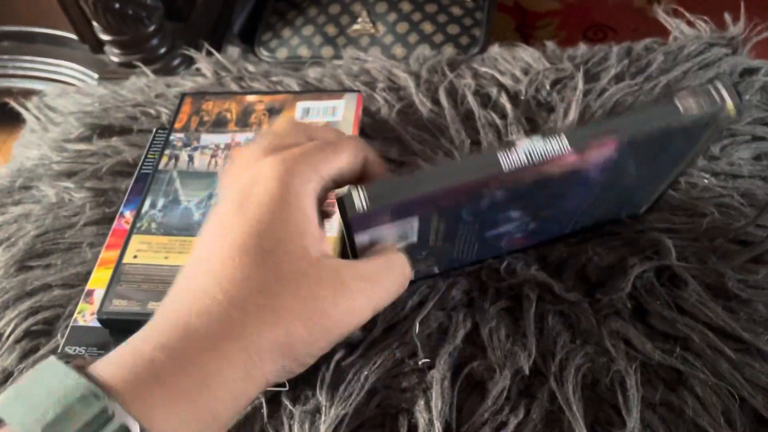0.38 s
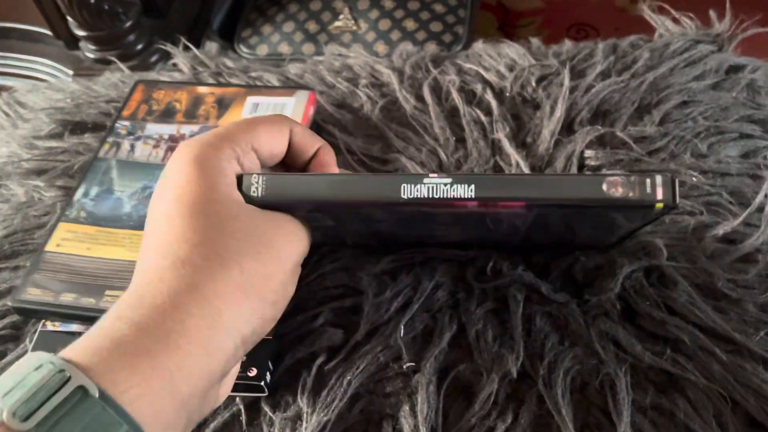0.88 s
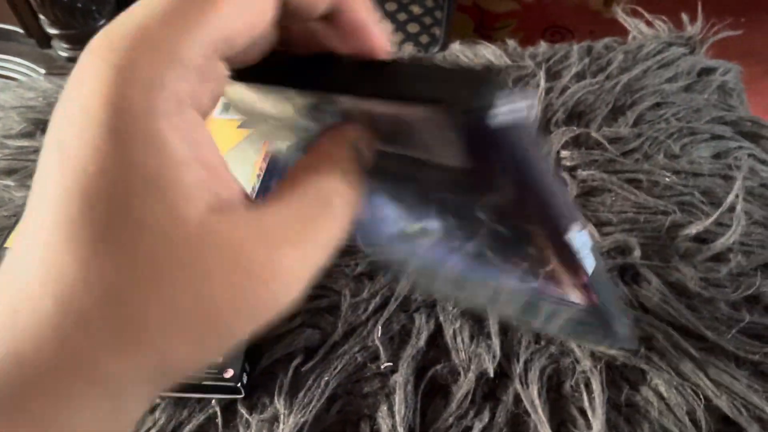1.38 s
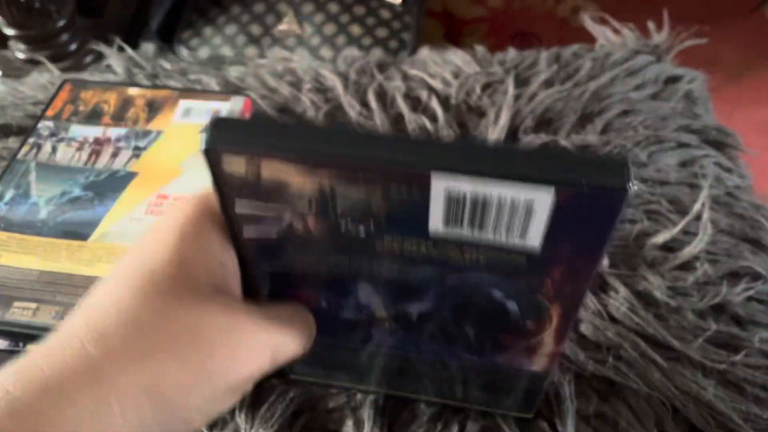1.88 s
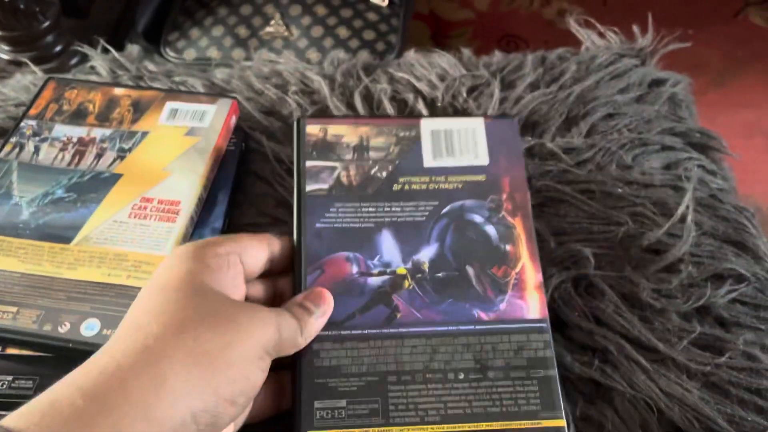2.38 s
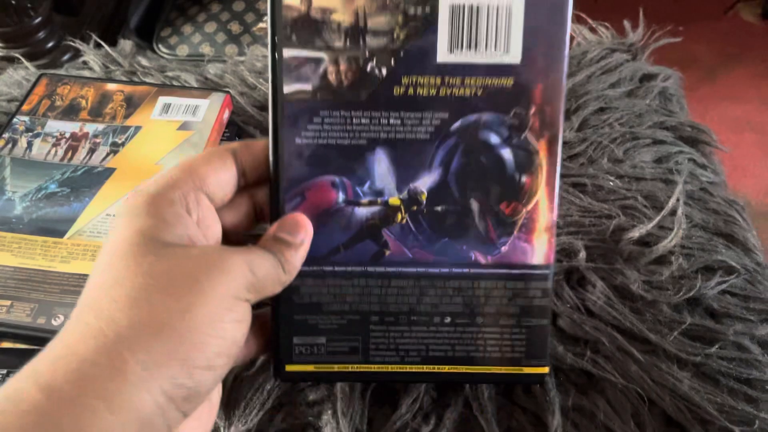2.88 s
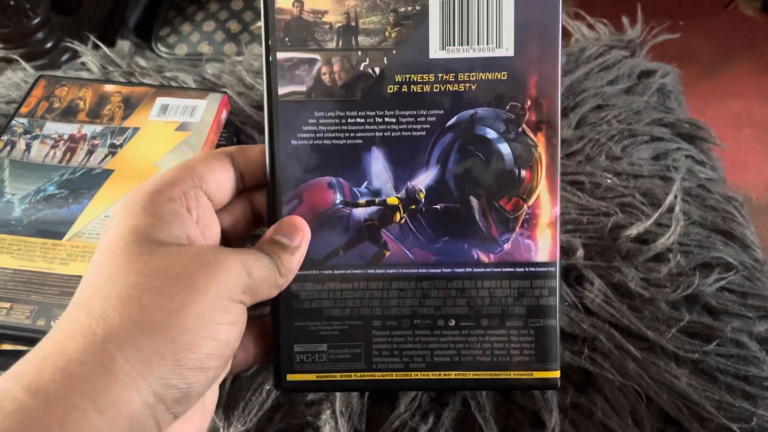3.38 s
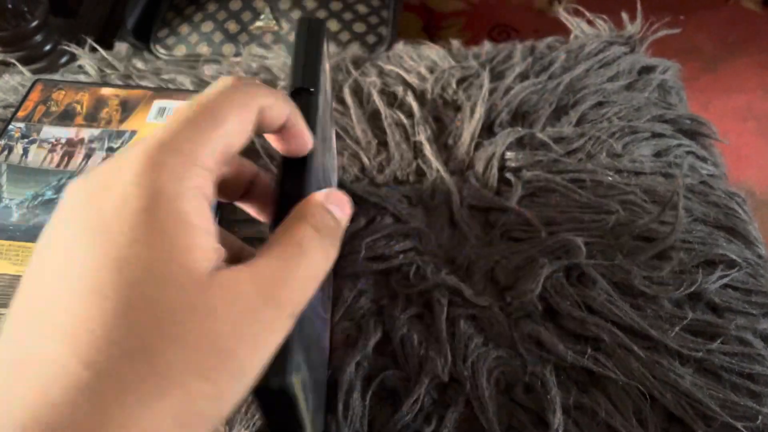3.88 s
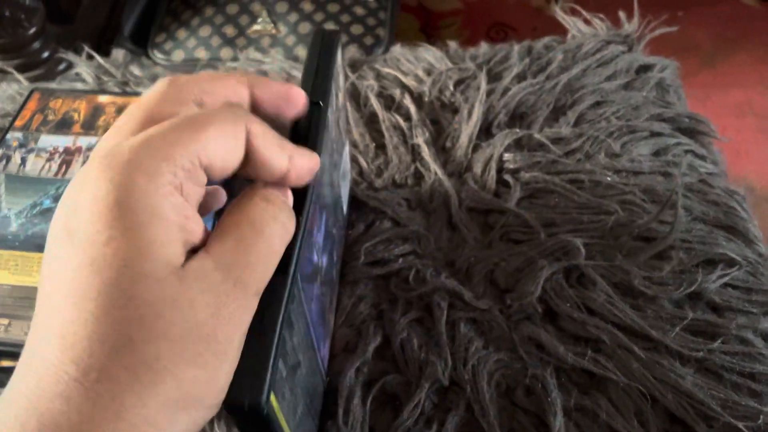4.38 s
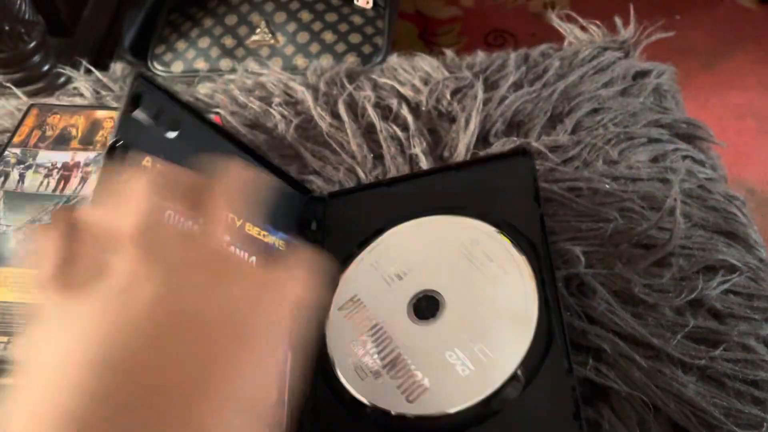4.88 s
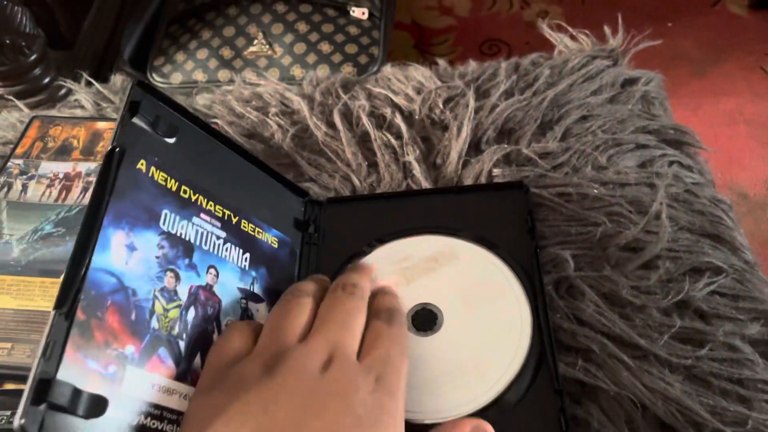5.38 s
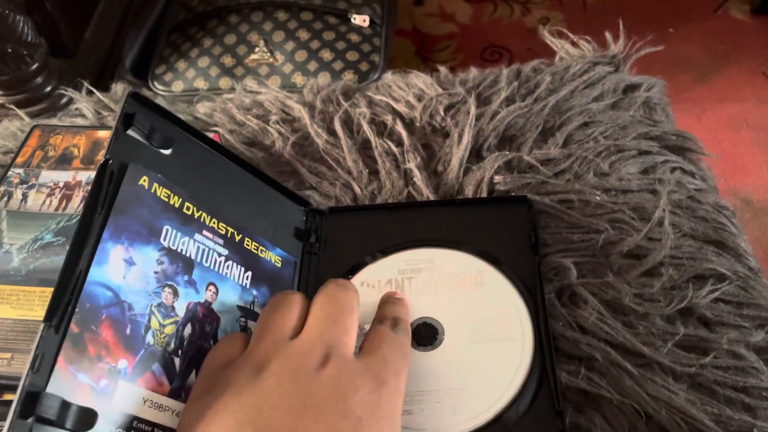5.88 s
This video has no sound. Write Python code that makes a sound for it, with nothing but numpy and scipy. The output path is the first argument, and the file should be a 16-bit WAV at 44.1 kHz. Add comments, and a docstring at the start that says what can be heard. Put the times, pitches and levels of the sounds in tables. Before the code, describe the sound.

Stereo microphones near the hand catch dry skin strokes, dull fingertip knocks and scattered light plastic ticks over faint room air. A sharper clack breaks the first half, followed by over a second of calm. The case is gripped again, bursts open with the loudest crack and a short rattle, and the disc inside clicks when pushed. Only a small, short room reflection follows.

```python
"""Over quiet room air and a low hum, a hand turns a thin plastic disc case: skin hisses on the sleeve
in strokes, the shell ticks and creaks, fingertips knock the hollow box. Harder snaps come near 2.3 s;
at 4.4 s the latch lets go, the lid flexes and the loose disc rattles; at 5 s the disc is pressed.
Filtered noise makes air and skin, jolts through damped modes the shell, decaying sines knocks and lid."""
import sys
import numpy as np
from scipy import signal
from scipy.fft import rfft, irfft, next_fast_len
from scipy.io import wavfile
from scipy.ndimage import uniform_filter1d

SR = 44100
rng = np.random.default_rng(int(sys.argv[2]) if len(sys.argv) > 2 else 0)


def inscribe(sig):
    """Save sig as 16-bit PCM at rate SR to the path in sys.argv[1].

    A 1-D sig is mono; a 2-D sig holds one channel per row.
    Samples are clipped to [-1, 1] before scaling.
    """
    pcm = np.round(np.clip(np.atleast_2d(sig).T, -1, 1) * 32767)
    wavfile.write(sys.argv[1], SR, pcm.astype(np.int16))


def attenuation_scalar(level_db):
    """Turn a level in dB into a linear amplitude multiplier (20 dB per decade)."""
    decades = np.asarray(level_db, float) / 20
    return 10 ** decades


N = 264159
OPEN_S = 4.45  # the lid is up from here on
LEAD = 44  # samples of soft start before a click

# modes of the shell: f/Hz, width/Hz, level/dB
SHELL = [(325, 210, -7.5), (664, 53, 1), (846, 190, -4), (1040, 136, 2), (1214, 86, -7.5), (1550, 91, 2),
         (1950, 400, -21), (2238, 120, 1.5), (2875, 170, -7), (2933, 48, -10.5), (3670, 83, -12.5),
         (4284, 110, -3.5), (5200, 130, -10.5), (6050, 380, -6.5), (8170, 3100, -22), (10330, 550, -14.5),
         (12500, 3300, -30)]
# hand sounds, likeness of the two microphones: f/Hz, correlation
NEAR_SAME = [(200, 0.92), (1400, 1), (3500, 0.49), (7000, 0.89), (15000, 0.96)]
# hand sounds, lean to the left: f/Hz, left minus right/dB
NEAR_LEFT = [(60, 1.5), (180, -3), (550, 5), (1650, 3), (4970, 2.5), (15000, -1)]


def unit_rms(x):
    """Scales to rms 1."""
    return x / np.sqrt(np.mean(np.abs(x) ** 2) + 1e-20)


def read(points, hz):
    """Interpolates a table on a log-frequency axis."""
    f, value = np.transpose(points)
    return np.interp(np.log(hz + 1), np.log(f + 1), value)


def add(mix, start_s, sound):
    """Lays a sound into the mix at start_s."""
    part = mix[:, round(start_s * SR):][:, :sound.shape[1]]
    part += sound[:, :part.shape[1]]


def pair(first, other, same, left_db):
    """Two microphone spectra that share the part `same` and lean left by left_db."""
    same = np.clip(same, -1, 1)
    left = first * attenuation_scalar(left_db / 2)
    right = (same * first + np.sqrt(1 - same ** 2) * other) * attenuation_scalar(-left_db / 2)
    return np.array([left, right])


def hiss(size, field_db, same, left):
    """Noise from random short-time spectra under field_db(hz, t), for both microphones."""
    hop = size // 4
    hz = np.fft.rfftfreq(size, 1 / SR)[:, None]
    t = np.arange(N // hop + 5) * hop / SR
    a, b, c, d = rng.standard_normal((len(t), len(hz), 4)).T
    z = pair(a + 1j * b, c + 1j * d, read(same, hz), read(left, hz)) * attenuation_scalar(field_db(hz, t))
    return signal.istft(z, nperseg=size, noverlap=size - hop)[1][:, :N]


def ring(hz, mode_hz, width_hz):
    """Response of one damped mode, gain 1 at its top."""
    return 1j * hz * width_hz / (mode_hz ** 2 - hz ** 2 + 1j * hz * width_hz)


def room_tone():
    """Steady air noise, and a low hum that wavers: noise through a narrow resonance twice."""
    # spectrum of the air, relative: f/Hz, density/dB per Hz
    air_spectrum = [(20, -17), (45, -20), (60, -10), (90, -15), (220, -12.5), (300, -19), (380, -26),
                    (1150, -28), (1450, -34.5), (3100, -41), (3800, -54.5), (7000, -64), (11000, -72),
                    (16000, -85)]
    # likeness of the two microphones: f/Hz, correlation
    air_same = [(60, 1), (180, 0.95), (550, 0.41), (1650, -0.26), (4970, 0.62), (15000, 0.7)]
    # lean to the left: f/Hz, left minus right/dB
    air_left = [(60, 8.5), (180, 1.5), (550, 4.5), (1650, -2), (4970, -0.5), (15000, 7)]
    air_rms_db, hum_rms_db = -51.5, -51
    hum_hz, pass_width_hz = 58.4, 12
    air = unit_rms(hiss(2048, lambda hz, t: read(air_spectrum, hz) + 0 * t, air_same, air_left))
    hum_filter = ring(np.fft.rfftfreq(N, 1 / SR), hum_hz, pass_width_hz) ** 2
    hum = unit_rms(irfft(rfft(rng.standard_normal(N)) * hum_filter, N))
    return attenuation_scalar(air_rms_db) * air + attenuation_scalar(hum_rms_db) * hum


def strokes(t):
    """Each stroke rises, holds and falls; gives their joint gain and the brightness of the mix."""
    # strokes of skin on the sleeve: start of hold/s, hold/s, hiss level/dB, brightness/dB per octave,
    # fall/dB per s
    stroke_table = [(.001, .08, -57.5, -1, 161), (0.284, .04, -69.5, -5, 300), (0.375, .04, -64, -3, 400),
                    (0.452, .13, -65, -3, 300), (0.647, .155, -60.5, 0.5, 204),
                    (1.03, .06, -61.5, 3.5, 300), (1.135, .06, -64.5, 1.5, 72),
                    (1.385, .045, -60.5, -2.2, 500), (1.481, .03, -65, -2.5, 400),
                    (1.587, .2, -60, 0.5, 500), (1.879, .09, -58, -1, 298), (2.056, .18, -68, -2, 300),
                    (2.268, .08, -60.5, -2.5, 296), (2.664, .06, -65.5, 2, 158),
                    (3.588, .1, -63.5, -3.5, 295), (3.777, .11, -64, -3.5, 300),
                    (3.982, .11, -71, -0.5, 150), (4.374, .16, -60, -1.8, 202.5),
                    (4.594, .03, -70.5, 5.5, 298), (4.685, .07, -70.5, 2.5, 201.5),
                    (4.901, .02, -64, 2.7, 600), (4.93, .1, -69, 2.5, 296), (5.024, .27, -58.5, 1.4, 396),
                    (5.352, .08, -69.5, -4, 300), (5.437, .04, -66.5, 9.5, 501),
                    (5.559, .03, -66, -2.5, 200.5), (5.816, .03, -67, -3, 401.5),
                    (5.932, .06, -78, -3, 300)]
    rise_faster = 3.05  # rise rate over fall rate
    start_s, hold_s, level_db, bright_db, fall_db = np.transpose(stroke_table)[:, :, None]
    outside_s = np.maximum(np.maximum(rise_faster * (start_s - t), t - start_s - hold_s), 0)
    power = attenuation_scalar(np.maximum(level_db - fall_db * outside_s, -150)) ** 2
    total = power.sum(0)
    return np.sqrt(total), (power * bright_db).sum(0) / total


def shell(hz, spot_db=0):
    """Sum of the shell's modes, neighbours in opposite sign, plus the part that does not ring."""
    # unringing part: f/Hz, level/dB
    crack = [(200, -38.5), (1000, -13), (3000, -9.5), (6000, -16), (9000, -22), (12000, -31),
             (14500, -31.5), (16500, -40.5)]
    mode_hz, width_hz, db = np.transpose(SHELL)[:, :, None]
    sign = (-1) ** np.arange(len(SHELL))[:, None]
    modes = sign * attenuation_scalar(db + spot_db) * ring(hz, mode_hz, width_hz)
    return modes.sum(0) + attenuation_scalar(read(crack, hz))


def slide():
    """Skin catches unevenly: a dry flickering hiss, and clumps of tiny slips set the shell murmuring."""
    # hiss of the skin, relative: f/Hz, level/dB
    skin_spectrum = [(300, -5.5), (1000, 7.5), (2500, -1), (4000, 1), (6000, -8.5), (8000, -8),
                     (11000, -12.5), (14000, -18.5), (16500, -33.5)]
    shut_db, open_db = -7, -10.5  # shell murmur against the hiss, lid shut and lid up
    slips_per_s = 2600
    hop = 64
    frames, t = N // hop + 5, np.arange(N) / SR
    frame_s = np.arange(frames) * hop / SR
    gain, bright_db = strokes(frame_s)
    flicker, clumps = (unit_rms(uniform_filter1d(rng.standard_normal(frames), size)) for size in (4, 14))

    # creases in the sleeve favour now one band, now another
    patches = uniform_filter1d(rng.standard_normal((frames, 129)), size=24, axis=0)
    patches = unit_rms(uniform_filter1d(patches, size=5, axis=1)).T
    rustle_db = 2.5 * patches

    def field_db(hz, t):
        tilt_db = bright_db * np.log2((hz + 300) / 6000)
        return rustle_db + read(skin_spectrum, hz) + tilt_db + 3.4 * flicker

    skin = unit_rms(hiss(4 * hop, field_db, NEAR_SAME, NEAR_LEFT))

    sizes = attenuation_scalar(3.7 * np.minimum(rng.exponential(1, (2, N)), 4)) * rng.choice([-1, 1], (2, N))
    sizes *= attenuation_scalar(3.2 * np.interp(t, frame_s, clumps))
    slips = sizes * (rng.random((2, N)) < slips_per_s / SR)
    hz = np.fft.rfftfreq(N, 1 / SR)
    slips = pair(*rfft(slips), read(NEAR_SAME, hz), read(NEAR_LEFT, hz))
    shell_murmur = irfft(slips * shell(hz), N)
    disc_murmur = (t > OPEN_S) * irfft(slips * disc(hz), N)
    murmur = (shell_murmur + disc_murmur) / shell_murmur.std()
    grip = attenuation_scalar(np.where(t > OPEN_S, open_db, shut_db))
    return np.interp(t, frame_s, gain) * (skin + grip * murmur)


def click(peak_db, ring_hz, hard_db, fade_db, chance, lid_up):
    """A few quick slips shake the shell; the spot that slips favours some modes and one above all."""
    favoured_db, away_db = 6, 1.5  # favoured ring; loss of other modes per octave away from it
    size = 4096
    hz, ms = np.fft.rfftfreq(size, 1 / SR), np.arange(size) / SR * 1000
    jolts = chance[:2 * size].reshape(2, size)
    jolts = jolts * np.abs(jolts) ** 0.8 * attenuation_scalar(-max(fade_db, 1) * ms)  # even the slowest creak dies
    jolts[0, :2] = 4.5  # sharp first break

    octaves_away = np.abs(np.log2(np.transpose(SHELL)[0, :, None] / ring_hz))
    spot_db = 1.5 * chance[2 * size:, None] - away_db * np.minimum(octaves_away, 1.5)
    body = shell(hz, spot_db)
    body = body + attenuation_scalar(favoured_db) * ring(hz, ring_hz, 0.077 * ring_hz)
    body = body + lid_up * attenuation_scalar(-22.5) * disc(hz)
    body *= attenuation_scalar(hard_db * np.log2((hz + 300) / 2300))

    sound = irfft(pair(*rfft(jolts), read(NEAR_SAME, hz), read(NEAR_LEFT, hz)) * body)
    sound = np.roll(sound, LEAD, 1)[:, :size // 2]
    sound = sound * signal.windows.tukey(size // 2, LEAD / size * 4)  # LEAD samples of fade each end
    return attenuation_scalar(peak_db) * sound / np.abs(sound[0]).max()


def clicks():
    """Every tick, creak and snap of the shell, each with its own random slips."""
    # clicks: t/s, left peak/dB, favoured ring f/Hz, hardness/dB per octave,
    # fade of the slips/dB per ms (below 1 acts as 1)
    click_table = [(0.021, -32.5, 3930, -7, 4.5), (0.0565, -37, 3650, -4, 0), (0.0677, -39.5, 1550, -12, 3),
                   (.1518, -43, 1490, 0, 2.9), (0.1672, -38, 4500, -4, 3), (0.3866, -45, 3100, 2, 3),
                   (.401, -49, 1500, 2, 1.5), (0.4755, -46.5, 1550, 5, 4), (0.5258, -41.5, 2240, -5.5, 2.5),
                   (0.54, -47, 2300, -3, 4), (.5608, -44, 3100, -4.5, 2.5), (0.6659, -38, 955, -5, 0.1),
                   (.732, -37.5, 690, -3, 1), (0.79, -40, 940, 0.5, 5.5), (.8017, -41.5, 725, -4.5, 4.5),
                   (0.8975, -45.5, 3670, -4, 6), (1.1492, -41, 2340, 1.5, 2),
                   (1.1573, -39.5, 4150, -3.5, 2.5), (1.1855, -37.5, 1620, -5.5, -1),
                   (1.3913, -44, 3610, 1, 0.5), (1.406, -39, 1270, -0.5, 2.5), (1.443, -48.5, 4440, 0, 3),
                   (1.4825, -38, 1560, -1.5, 3), (1.5, -44, 2470, -1.5, 12), (1.5699, -34.5, 980, -4.5, 7),
                   (1.7263, -46, 1550, -3, 2), (1.831, -45.5, 905, 0, 1.5),
                   (1.8888, -39.5, 3570, -3.5, 1.5), (1.9061, -32.5, 1550, -1, 0.9),
                   (1.9203, -29, 1520, -0.5, 1), (1.925, -30.5, 1550, 0, 4), (1.9607, -27.5, 3880, -3, 2.5),
                   (1.968, -37.5, 830, -5, 10), (1.995, -52.5, 6100, 6, 7), (2.05, -53.5, 3500, -5, 9),
                   (2.095, -46.5, 2480, -2, 5), (2.188, -39.5, 2570, -2.8, -3),
                   (2.2186, -34, 5300, -5.5, 3), (2.275, -14.5, 2450, 3, 13), (2.277, -26, 2450, 2.5, 2),
                   (2.2796, -16, 2960, 0, 3.5), (2.2919, -34, 1220, 1, 3), (2.3093, -25.5, 1560, -2, 1.4),
                   (2.3239, -27, 5880, -2.5, 3), (2.3339, -31.5, 1066, 2.5, 2),
                   (2.3389, -24, 3080, -2.5, 3.5), (2.3774, -41.5, 1130, -8, 1.5),
                   (2.3917, -40.5, 1170, 0, 13), (2.79, -58.5, 5000, 0, 12), (3.5872, -37, 3670, -3, 2.6),
                   (3.6, -44, 1170, -.5, 3), (3.6414, -41, 744, -3, 9.5), (3.6619, -32, 950, 0.1, 3.5),
                   (3.747, -44.5, 1990, -5.5, -1), (3.7826, -40, 940, -3.5, 1),
                   (3.8092, -39.5, 1310, 4.5, 5.5), (3.822, -36.5, 1580, -5, -0.5),
                   (3.831, -36.5, 3450, -5.7, 1.3), (3.8512, -33.5, 1484, -2, 2.5),
                   (3.8834, -38.5, 780, -3.5, 1.5), (4.0543, -47, 870, -1, 3), (4.379, -8, 960, -3, 1.4),
                   (4.3829, -8.5, 1190, -1, 2.5), (4.3842, -2.5, 1060, 0.5, 11.5),
                   (4.3955, -14, 1110, 4.5, 10), (4.3992, -18.5, 6050, -3.2, 1),
                   (4.4025, -13.5, 2300, -0.5, 2), (4.4116, -18.5, 935, 0, 0.5),
                   (4.4197, -20.5, 2450, 6, 0), (4.4246, -15.5, 4350, 4.5, 1.7), (4.43, -21, 4300, 1, 11),
                   (4.439, -19, 930, 1, 1), (4.443, -24, 2800, -1, 5.5), (4.4532, -24.5, 3070, -2, 2),
                   (4.462, -20, 2450, 5.5, 8.5), (4.4657, -20, 960, -0.9, 7.5),
                   (4.477, -26, 2440, -1.5, 1.8), (4.4974, -35.5, 3000, 2.5, 2.3),
                   (4.508, -35.5, 2265, -0.5, 2.5), (4.5203, -29, 2540, -1.5, 9.5),
                   (4.5259, -38, 2470, -6.5, 2.5), (4.5358, -38, 2950, -8.5, 4),
                   (4.5777, -47, 2840, -4.5, 1.9), (4.7177, -39.5, 746, -13, 21),
                   (4.763, -47, 3000, -9.5, 1), (4.8902, -45, 1020, 3.5, 1.2),
                   (5.0302, -19.5, 3000, 5.5, 6), (5.0341, -26, 1097, -1.5, 2),
                   (5.0472, -25, 2360, -3, 2.5), (5.0593, -13.5, 2650, 0.8, 3.5),
                   (5.0797, -36, 2470, 0.5, 2.5), (5.085, -36, 2400, 4.5, 10.5),
                   (5.1208, -37.5, 4620, -2, 2.3), (5.1675, -36.5, 850, -11, 7),
                   (5.2257, -40.5, 2950, 2.5, -3.3), (5.2509, -34, 1020, -3, 3.2), (5.283, -43, 2800, 3, 0),
                   (5.361, -46, 2800, -5, 5.5), (5.393, -45, 2780, -3, 1), (5.417, -49.5, 2580, -0.5, 2),
                   (5.4765, -47, 717, 5, 5), (5.5557, -25.5, 2450, -4, 3), (5.5615, -29, 2860, -1.5, 2.5),
                   (5.5703, -31.5, 2840, -3, 3), (5.8305, -43, 2830, -7, 5)]
    mix = np.zeros((2, N))
    chance = rng.standard_normal((len(click_table), 8192 + len(SHELL)))
    for (s, *blow), row in zip(click_table, chance):
        add(mix, s - LEAD / SR, click(*blow, row, s > OPEN_S))
    return mix


def room(x):
    """Sparse reflections of random sign, each band dying at its own speed."""
    # decay of the reflections: f/Hz, t60/s
    decay = [(250, 0.28), (1000, 0.21), (4000, 0.12), (12000, 0.048)]
    first, spacing = 200, 20  # samples
    taps = np.zeros((2, SR // 2))
    at = np.arange(first, SR // 2 - spacing, spacing)
    at = at + rng.integers(0, spacing, (2, (SR // 2 - first - 1) // spacing))
    np.put_along_axis(taps, at, rng.choice([-1., 1.], at.shape), 1)
    hz, t, z = signal.stft(taps, SR, nperseg=256)
    tail = signal.istft(z * attenuation_scalar(-60 * t / read(decay, hz)[:, None]), SR, nperseg=256)[1]
    return signal.fftconvolve(x, tail / np.linalg.norm(tail[0]), axes=1)[:, :N]


def knocks():
    """Under a soft fingertip blow the air inside the box gives one short low note, a decaying sine."""
    # knocks: t/s, level before soft onset/dB (mean of left and right), f/Hz, t60/s
    knock_table = [(.064, -37, 349, 0.057), (0.671, -21, 265, 0.014), (0.794, -29, 368, 0.022),
                   (4.3827, -13.5, 327, 0.038), (4.384, -30, 750, 0.06), (5.059, -23, 274, 0.029),
                   (5.169, -40.5, 405, 0.034), (5.557, -39, 302, 0.041)]
    mix, t = np.zeros((2, N)), np.arange(SR // 5) / SR
    onset = 1 - np.exp(-t / 0.002)
    for s, db, hz, t60_s in knock_table:
        note = np.sin(2 * np.pi * hz * t) * attenuation_scalar(db - 60 * t / t60_s) * onset
        add(mix, s, note * attenuation_scalar([[1.3], [-1.3]]))  # leans left
    return mix


def flex():
    """As the latch lets go, the whole lid swings slowly, dropping in pitch as it settles."""
    # swings: t/s, level before soft onset/dB, first f/Hz, last f/Hz, glide time constant/ms, t60/s
    flex_table = [(4.384, -18, 162, 56.8, 7.5, .2)]
    mix, t = np.zeros((2, N)), np.arange(SR // 2) / SR
    onset = 1 - np.exp(-t / 0.002)
    for s, db, first_hz, last_hz, glide_ms, t60_s in flex_table:
        hz = last_hz + (first_hz - last_hz) * np.exp(-t * 1000 / glide_ms)
        phase = 2 * np.pi * np.cumsum(hz) / SR
        swing = -np.sin(phase) * attenuation_scalar(db - 60 * t / t60_s) * onset
        add(mix, s, np.array([swing, swing]))
    return mix


def disc(hz):
    """Modes of the loose disc rattling on its hub, heard once the lid is up."""
    # modes of the disc: f/Hz, width/Hz, level/dB
    disc_modes = [(2350, 260, 9), (2900, 300, 10)]
    return sum(attenuation_scalar(db) * ring(hz, f, width_hz) for f, width_hz, db in disc_modes)


def scene():
    """Hand and case close by, reflections of the blows, and the room tone."""
    reflections_db = -18
    blows = clicks() + knocks()
    return blows + attenuation_scalar(reflections_db) * room(blows) + flex() + slide() + room_tone()


def band_limit(x):
    """A steep low-pass at the top of the band."""
    return signal.sosfilt(signal.butter(12, 16570, fs=SR, output="sos"), x)


def record(dry):
    """The two microphone ports turn against each other in phase toward the treble."""
    # microphone pair: f/Hz, phase lead of left/rad
    ports = [(0, 0), (350, .3), (2400, 1), (4500, .2), (6500, -.6), (7600, -2.8), (8600, -3.3),
             (9650, -4.5), (10700, -5.7), (11700, -6.3), (12700, -6.9), (13800, -8.8), (14800, -9.4),
             (16500, -9.5)]
    size = next_fast_len(N + 512)
    turn = np.exp(1j * read(ports, np.fft.rfftfreq(size, 1 / SR)))
    left = irfft(rfft(dry[0], size) * turn, size)[:N]
    return band_limit(np.array([left, dry[1]]))


dry = scene()
out = record(dry)
inscribe(out)
```